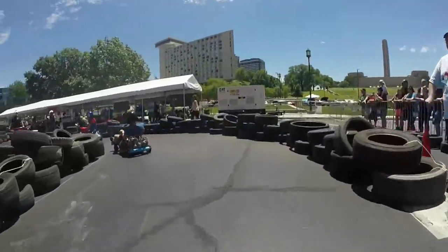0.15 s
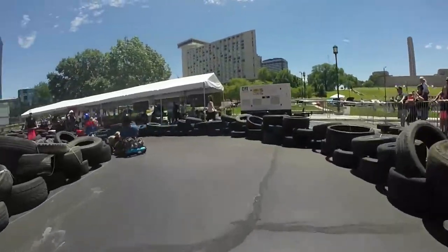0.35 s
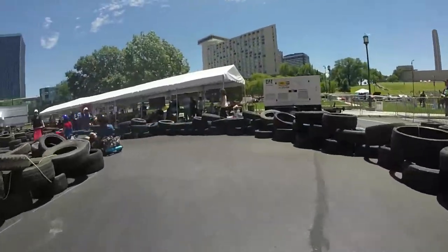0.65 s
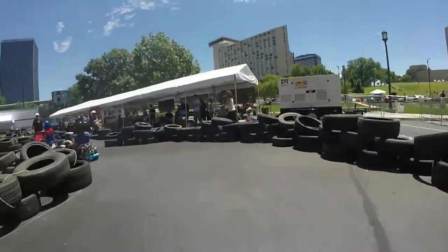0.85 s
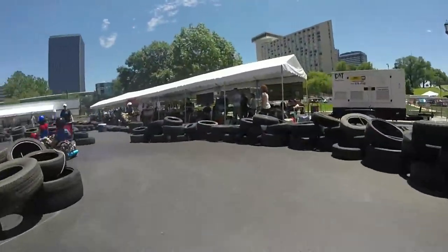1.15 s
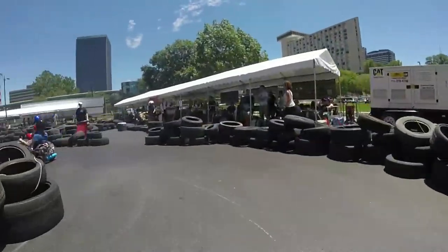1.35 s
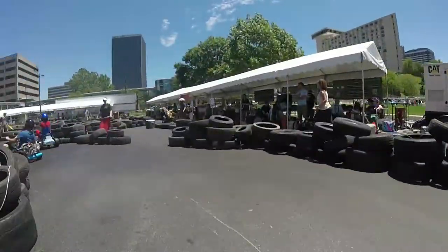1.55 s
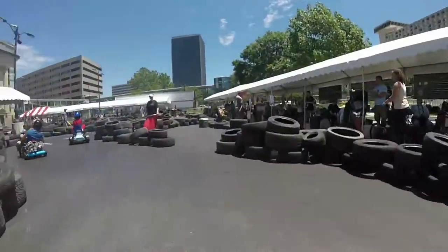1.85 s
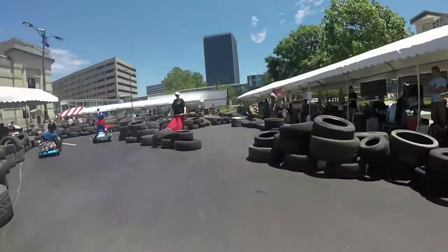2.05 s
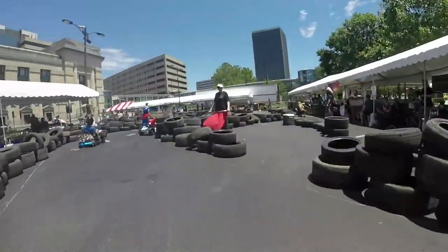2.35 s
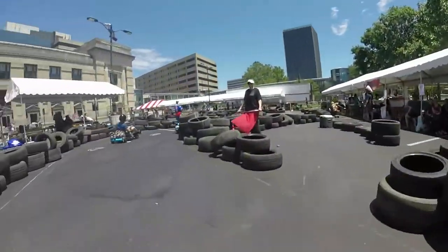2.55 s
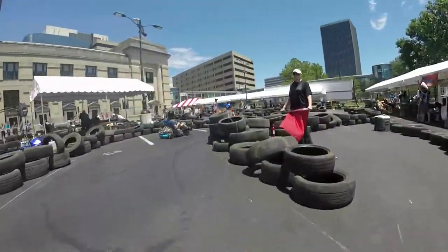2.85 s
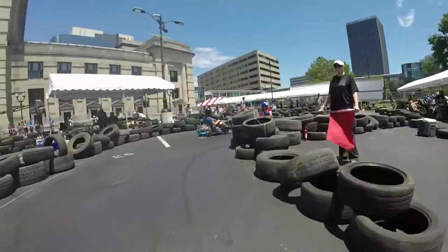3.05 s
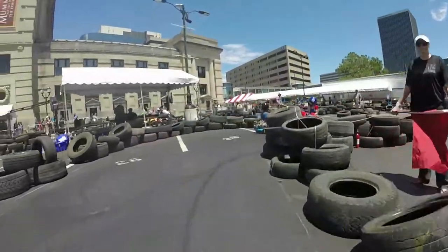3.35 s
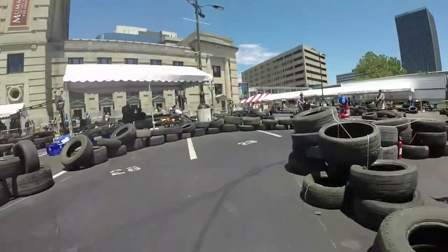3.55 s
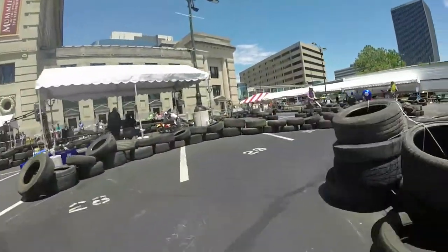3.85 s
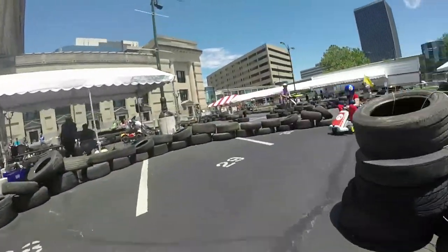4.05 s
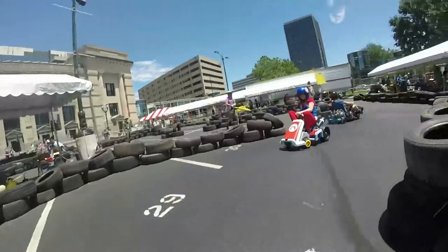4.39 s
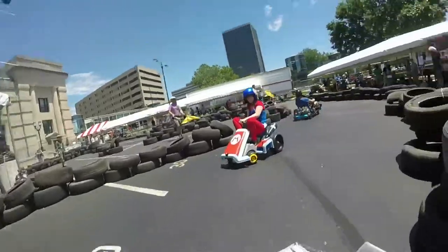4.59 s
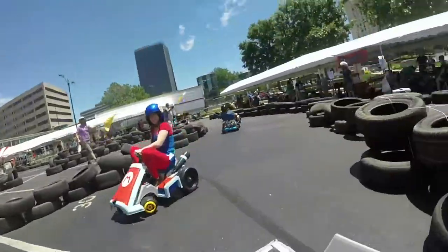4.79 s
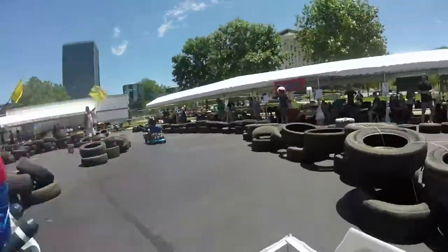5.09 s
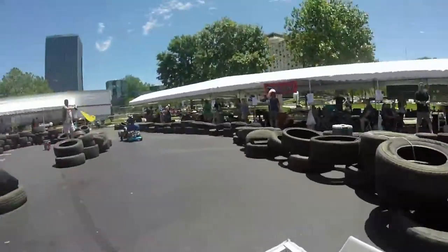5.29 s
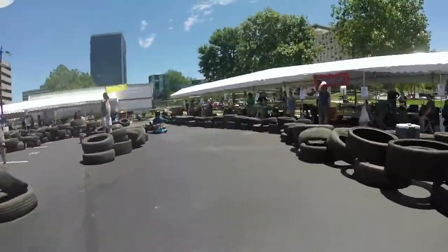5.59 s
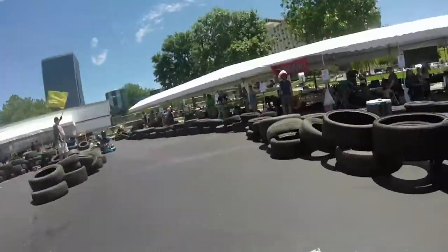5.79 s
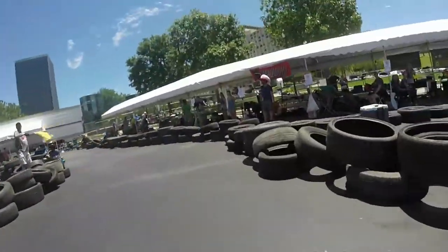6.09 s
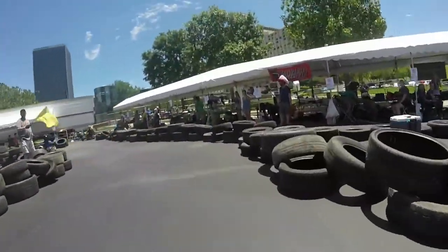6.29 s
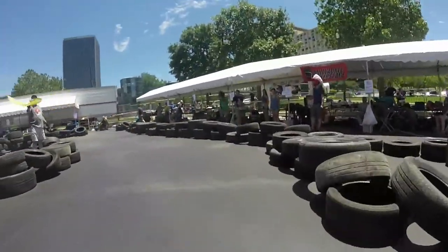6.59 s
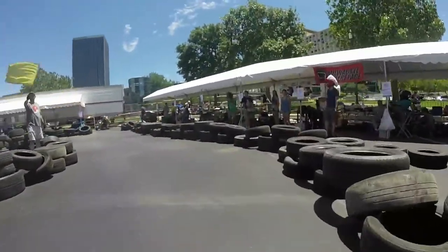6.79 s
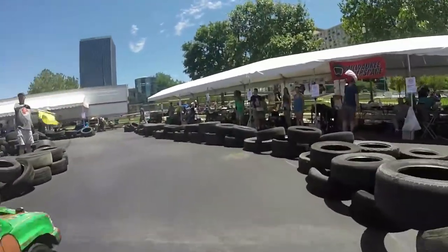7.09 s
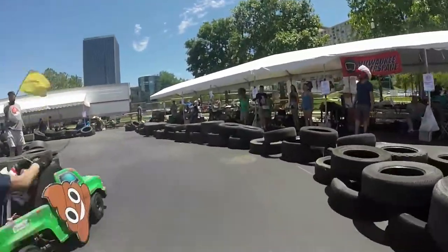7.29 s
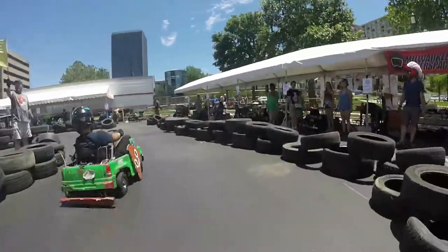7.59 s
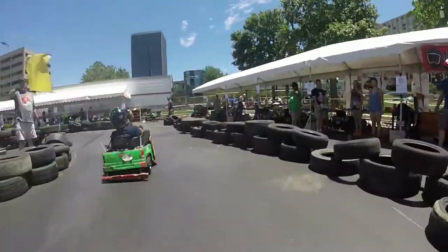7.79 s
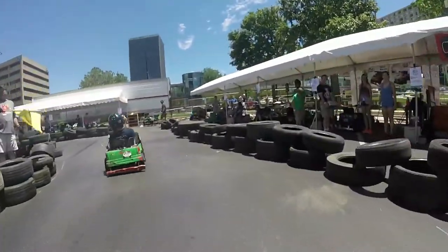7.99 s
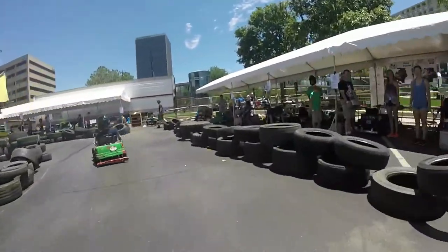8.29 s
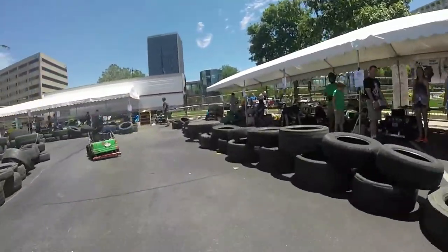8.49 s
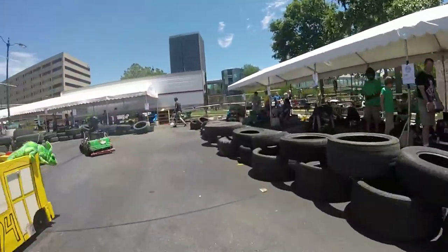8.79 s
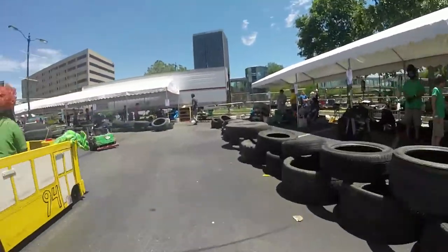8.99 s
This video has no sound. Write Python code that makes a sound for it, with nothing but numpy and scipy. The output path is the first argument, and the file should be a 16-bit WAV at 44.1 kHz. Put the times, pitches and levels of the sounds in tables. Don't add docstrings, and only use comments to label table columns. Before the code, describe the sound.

Small electric kart whines steadily, cuts to silent coasting with rattling knocks and frame thumps, then snatches back into a lower, climbing whine.

```python
import sys
import numpy as np
from scipy import signal
from scipy.fft import rfft, irfft
from scipy.io import wavfile
from scipy.ndimage import uniform_filter1d

SR = 44100
rng = np.random.default_rng(int(sys.argv[2]) if len(sys.argv) > 2 else 0)


def invert_db(x):
    u = np.asarray(x, float) / 20
    return 10 ** u


def master(y):
    cut = np.clip(np.atleast_2d(y).T, -1, 1)
    pcm = np.round(cut * 32767)
    wavfile.write(sys.argv[1], SR, pcm.astype(np.int16))


N = 403074
TIME_S = np.arange(N) / SR
TEETH_PER_TURN = 2.099
MAIN_ORDERS = [TEETH_PER_TURN, 2 * TEETH_PER_TURN, 3, 4, 6]
LIFT_OFF_S = 4.56

# [freq_hz, density_db]
LOOSE_SPECTRUM = [(500, -38), (700, 3), (860, -3), (990, -8), (1140, -2.5), (1600, -2), (1800, -5),
                  (2300, -5), (3000, -19), (3300, -21), (3750, -21), (4300, -42), (9000, -70)]


def rms_one(x):
    return x / np.sqrt(np.mean(x ** 2) + 1e-20)


def in_time(rows):
    s, *columns = np.transpose(rows)
    return [np.interp(TIME_S, s, column) for column in columns]


def spells_db(rows, rise_db_s, sag_db_s, fall_db_s, rest_db):
    grid_s = np.arange(0, N / SR + .002, .001)
    start_s, length_s, level_db = np.transpose(rows)[:, :, None]
    age_s = grid_s - start_s
    rise = rise_db_s * np.minimum(age_s, 0)
    sag = sag_db_s * np.clip(age_s, 0, length_s)
    fall = fall_db_s * np.maximum(age_s - length_s, 0)
    shape_db = level_db + rise - sag - fall
    return np.interp(TIME_S, grid_s, np.maximum(shape_db.max(axis=0), rest_db))


def drift(rate_hz):
    r = np.exp(-40 * np.pi * rate_hz / SR)
    slow = signal.lfilter([1], [1, -2 * r, r * r], rng.standard_normal(N // 20 + 2002))[2000:]
    return np.interp(np.arange(N) / 20, np.arange(len(slow)), rms_one(slow))


def grit(per_s, spread_db):
    sizes = invert_db(spread_db * np.minimum(rng.exponential(1, N), 4)) * rng.standard_normal(N)
    return rms_one(sizes * (rng.random(N) < per_s / SR))


def once_per(cycles):
    return np.diff(np.floor(cycles), prepend=np.floor(cycles[0]))


def colour(x, spectrum):
    hz, level_db = np.transpose(spectrum)
    log_hz = np.log(np.maximum(np.arange(4097) * SR / 8192, 1))
    cepstrum = irfft(np.interp(log_hz, np.log(hz), level_db) * np.log(10) / 20)
    cepstrum[1:4096] *= 2
    cepstrum[4097:] = 0
    response = irfft(np.exp(rfft(cepstrum)))
    return signal.oaconvolve(x, response / np.linalg.norm(response))[:N]


def ring(clicks, hz, width_hz):
    r, w = np.exp(-np.pi * width_hz / SR), 2 * np.pi * hz / SR
    return signal.lfilter([0, np.sin(w)], [1, -2 * r * np.cos(w), r * r], clicks + 1e-18)


def panels(x, modes):
    out = 0
    for hz, width_hz, db in modes:
        edges_hz = [hz - width_hz / 2, hz + width_hz / 2]
        band = signal.butter(2, edges_hz, "band", fs=SR, output="sos")
        out = out + invert_db(db) * signal.sosfilt(band, x + 1e-18)
    return out


def frame_db(hz):
    # [mode_hz, width_hz, gain_db]
    resonances = [(205.3, 26, -4), (249.6, 13.2, 0.48), (314.5, 11.3, 2.3), (393.4, 41.7, -3.5),
                  (624.6, 41, -16)]
    coarse_hz = hz[::64]
    total = 0
    for k, (mode_hz, width_hz, db) in enumerate(resonances):
        detuning = mode_hz ** 2 - coarse_hz ** 2 + 1j * width_hz * coarse_hz
        total = total + (-1) ** k * invert_db(db) * coarse_hz ** 2 * width_hz / mode_hz / detuning
    return np.interp(np.arange(N) / 64, np.arange(len(coarse_hz)), 20 * np.log10(np.abs(total)))


def drive_state():
    # [time_s, turns_hz, load_db]
    speed = [(0.0, 104.3, 0), (0.3, 106.8, 0), (1.05, 111.1, -0.1), (1.3, 113.2, 1.2), (1.9, 114.6, 0.1),
             (2.5, 110.6, 0.1), (3.2, 108.4, 0.1), (4.42, 107.3, 0.4), (4.6, 101.1, -6.5),
             (6.88, 63.13, -7), (7.07, 62.19, -0.1), (7.46, 66.33, -3.5), (7.76, 72.08, -1),
             (8.07, 76.44, 3.5), (8.3, 77.36, 1.5), (8.58, 81.07, 3), (8.95, 83.5, 1), (9.14, 88.16, 6.5)]
    # [cruise_db, pull_db]
    forces = [
        (-2, -5),
        (-18.5, -18.5),
        (-15, -13),
        (-20, -15),
        (-5, 1),
    ]
    throttle_s, fade_s, start_turn = 6.83, 0.068, 0.03
    turns_hz, load_db = in_time(speed)
    turns_hz = turns_hz * (1 + .0025 * drift(6))
    driven, pulling = in_time([(LIFT_OFF_S, 1, 0), (LIFT_OFF_S + fade_s, 0, 0),
                               (throttle_s, 0, 1), (throttle_s + fade_s, 1, 1)])
    levels_db = []
    for order, (cruise_db, pull_db) in zip(MAIN_ORDERS, forces):
        force_db = cruise_db + pulling * (pull_db - cruise_db) + load_db
        levels_db.append(force_db + frame_db(order * turns_hz))
    return start_turn + np.cumsum(turns_hz) / SR, levels_db, load_db, driven, pulling


def drivetrain(turns, levels_db, driven, pulling):
    # [order_per_turn, cruise_db, pull_db]
    motor_lines = [(5, -19, -24), (7, -21, -22.5), (8, -27, -17), (9, -50, -46), (10, -58.5, -50),
                   (11, -61.5, -53.5), (12, -60, -41), (13, -65.5, -55), (14, -60, -57.5), (15, -60, -51.5),
                   (16, -64.5, -55), (17, -56.5, -53.5), (18, -55.5, -47.5), (19, -59, -61), (20, -61, -57),
                   (21, -66, -58.5), (22, -63.5, -61.5), (23, -62.5, -59.5), (24, -64, -50.5),
                   (25, -68.5, -57), (26, -66, -56), (27, -69, -57.5), (29, -70.5, -58.5), (28, -65, -57.5),
                   (30, -65.5, -57.5), (33, -66, -64), (36, -69.5, -50), (42, -76, -55.5)]
    # [order_per_turn, cruise_db, pull_db]
    side_lines = [(12.29, -61.5, -58.5), (16.29, -67.5, -55.5), (19.71, -68.5, -54)]
    # [tooth_multiple, cruise_db, pull_db]
    tooth_lines = [(3, -33.5, -28.5), (4, -49, -54), (5, -50.5, -53.5), (6, -58, -63), (7, -56, -62),
                   (8, -61, -59), (9, -55, -61.5), (10, -55.5, -56.5), (11, -56.5, -59), (12, -58, -61.5)]
    # [freq_hz, gain_db]
    panel_response = [(410, -21), (600, 1), (720, -6), (880, -3.5), (990, -15.5), (1060, -8), (1140, -4),
                      (1370, 2.5), (1700, -1), (2040, -7.5), (2400, -10), (2660, -4), (2790, -21.5),
                      (3280, -16.5), (3530, -38.5), (7770, -120)]
    turns_hz = np.gradient(turns) * SR
    direct, high = np.zeros(N), np.zeros(N)
    for order, level_db in zip(MAIN_ORDERS, levels_db):
        slack = .014 * drift(18)
        direct += invert_db(level_db + 1.3 * drift(18)) * np.cos(2 * np.pi * (order * turns + slack))
    weak = motor_lines + side_lines + [(k * TEETH_PER_TURN, a, b) for k, a, b in tooth_lines]
    wavers = [drift(8.7) for _ in range(4)]
    swells = [invert_db(2.6 * waver) for waver in wavers]
    for k, (order, cruise_db, pull_db) in enumerate(weak):
        level = (invert_db(cruise_db) + pulling * (invert_db(pull_db) - invert_db(cruise_db))) * swells[k % 4]
        phase = order * turns + rng.random() + 0.08 * wavers[k % 3]
        line = level * np.sin(2 * np.pi * phase)
        if order < 8.2:
            direct += invert_db(frame_db(order * turns_hz)) * line
        else:
            high += line
    return np.sqrt(2) * driven * (direct + colour(high, panel_response))


def easing_db():
    ease_s, whip_at_s, whip_end_s, wheel_hz = 4.0, 4.503, 4.72, 26
    eased = np.clip((TIME_S - ease_s) / (LIFT_OFF_S - ease_s), 0, 1) * (TIME_S < whip_end_s)
    return eased * (-4 + 6 * np.cos(2 * np.pi * wheel_hz * (TIME_S - whip_at_s)))


def spray():
    # [start_s, length_s, level_db]
    sprays = [
        (6.702, 0.12, -50.5),
        (6.74, 0.013, -43),
    ]
    roar = invert_db(spells_db([sprays[0]], 21.5, 0, 20.5, -120))
    return roar + invert_db(spells_db([sprays[1]], 900, 0, 504, -120))


def road_levels(load_db, driven, pulling, buzz, passing_db, eased_db):
    # [start_s, length_s, level_db]
    bumps = [
        (4.62, 0.25, -21.5),
        (4.8, 0.056, -15.5),
        (4.935, 0.099, -9.5),
        (5.1, 0.424, -14),
        (5.74, 0.073, -14.5),
        (5.88, 1, -23.5),
        (6.078, 0.013, -16.5),
        (6.44, 0.29, -21),
        (6.6, 0.28, -15),
        (6.84, 0.12, -9.5),
    ]
    smooth_db, coast_hiss_db = -25.5, -62.5
    bumps_db = spells_db(bumps, 494, 4, 354, smooth_db)
    follow_db = 0.18 * load_db
    rumble_db = -19.5 - 1.5 * pulling + follow_db
    clatter_db = -31.5 + 1.5 * pulling + follow_db
    hiss_db = -58 - 2.5 * pulling + follow_db
    rumble_db = np.maximum(bumps_db, smooth_db + driven * (rumble_db - smooth_db))
    loose_db = -45 + 0.51 * (bumps_db + 23.5)
    hiss = invert_db(coast_hiss_db + driven * (hiss_db - coast_hiss_db))
    hiss = hiss + invert_db(14.5) * buzz + invert_db(passing_db + 2.5) + spray()
    clatter_db = 20 * np.log10(invert_db(clatter_db) + invert_db(35) * buzz)
    clatter_db = loose_db + driven * (clatter_db + eased_db - loose_db)
    return rumble_db, clatter_db, 20 * np.log10(hiss) + driven * eased_db


def road(turns, driven, rumble_db, clatter_db, hiss_db):
    # [start_s, length_s, level_db]
    lurches = [
        (0.0, 0.044, -23),
        (0.8, 0.077, -20.5),
        (4.63, 0.15, -23),
        (5.75, 0.11, -16.5),
        (6.8, 0.078, -17.5),
        (8.2, 0.22, -23),
        (.43, .05, -23),
        (5.2, 0.11, -26),
        (5.95, 0.13, -19),
    ]
    # [freq_hz, density_db]
    rumble_spectrum = [(26, -41.5), (45, -20.5), (65, -9.5), (136, -14), (228, -3.5), (303, -2), (345, -5),
                       (403, -12), (436, -15.5), (619, -24.5), (723, -43), (792, -25.5), (1000, -46.5),
                       (1300, -64), (2200, -120)]
    # [freq_hz, density_db]
    clatter_spectrum = [(410, -25.5), (700, 2.5), (858, -8.5), (930, -2), (990, -16.5), (1060, -9),
                        (1140, -2.5), (1370, 1.5), (1540, -4), (1640, -2.5), (1770, -7), (2040, -9),
                        (2340, -5.5), (2900, -22), (3280, -15.5), (3530, -39.5), (4590, -47), (7770, -120)]
    # [freq_hz, density_db]
    hiss_spectrum = [(2600, -102.6), (3300, -85.5), (3750, -77.5), (4200, -83), (4700, -81.5),
                     (5200, -88.5), (5700, -84.5), (6300, -85), (7000, -98), (7600, -95.5), (8500, -93.5),
                     (10000, -101.2), (12000, -104.7), (13500, -110), (15500, -140)]
    slack_s, sway_hz = 5.05, 27
    sway_db = spells_db(lurches, 82, 0, 48, -30)
    tooth_beat = 1 + .4 * np.cos(2 * np.pi * (TEETH_PER_TURN * turns - .05))
    jolts = drift(30) + .5 * drift(12)

    rumble = colour(invert_db(rumble_db + 1.1 * jolts) * rng.standard_normal(N), rumble_spectrum)
    tension = np.maximum(driven, np.clip(20 * (slack_s - TIME_S), 0, 1))
    low = signal.sosfiltfilt(signal.butter(2, 150, fs=SR, output="sos"), rumble)
    rumble = rumble - 0.55 * tension * low

    sway = ring(ring(rng.standard_normal(N), sway_hz, 16), sway_hz, 26)
    sway = invert_db(sway_db) * rms_one(sway)

    shake = invert_db(clatter_db + 2.2 * jolts * (1 - 0.37 * driven)) * grit(5000, 2.2)
    chain = colour(shake * driven * tooth_beat, clatter_spectrum)
    sparse = invert_db(clatter_db - 20.5) * grit(150, 2.5)
    rattle = colour((1 - driven) * (shake + sparse), LOOSE_SPECTRUM)

    air = (1 - driven + driven * tooth_beat) * invert_db(hiss_db + 2.3 * jolts) * grit(12000, 1.5)
    case_seal = signal.butter(2, 8500, fs=SR, output="sos")
    hiss = signal.sosfilt(case_seal, colour(air, hiss_spectrum))
    return rumble + sway + chain + rattle + hiss + invert_db(15.0) * panels(air, [(5630, 54, 0.0046)])


def ticks(driven):
    # [time_s, peak_db]
    slaps = [(0.0569, -42), (0.164, -37), (0.2514, -38), (0.312, -38), (0.4046, -51), (0.5813, -35),
             (0.628, -49), (3.7394, -40.5), (4.004, -34), (5.123, -42), (5.6243, -41), (5.7917, -24.5),
             (6.7449, -29), (7.204, -37), (7.29, -48), (7.4915, -36), (7.63, -36), (7.945, -38.5),
             (8.08, -24.5), (8.1786, -30.5), (8.436, -52), (8.4835, -32.5), (8.543, -36.5), (8.6065, -49.5),
             (8.8058, -39.5), (9.0503, -37), (0.078, -43), (0.917, -42.5), (1.156, -42.5), (3.912, -34),
             (7.134, -40), (7.222, -42), (7.345, -38), (7.648, -34.5), (8.301, -49), (8.673, -44.5),
             (8.898, -40.5), (9.1, -42.5), (4.928, -41), (5.024, -37.5), (5.765, -36.5), (8.125, -39),
             (8.148, -42), (8.197, -39.5), (8.268, -41), (8.377, -51.5)]
    # [freq_hz, width_hz, gain_db]
    modes = [(1500, 2800, 4), (2420, 1200, 11.5), (3200, 240, 6), (4750, 860, 5), (5470, 450, 4),
             (6600, 350, -5), (9000, 3800, -28.5)]
    clicks = invert_db(-68) * driven * grit(200, 1.8)
    for s, peak_db in slaps:
        clicks[round(s * SR)] += invert_db(peak_db + 10.0)
    puffs = signal.lfilter([1], [1, -.975], clicks) * rng.standard_normal(N)
    return panels(puffs, modes)


def buzz_spells():
    # [start_s, end_s, level_db]
    spans = [(0.132, 0.22, -79), (0.243, 0.306, -81), (0.393, 0.407, -74), (0.543, 0.585, -76),
             (0.714, 0.741, -78), (0.883, 0.907, -69), (0.974, 0.988, -71), (1.021, 1.031, -75),
             (1.191, 1.715, -70.5), (1.774, 1.809, -76), (1.84, 1.93, -73), (1.966, 2.027, -70.5),
             (2.046, 2.08, -72), (2.09, 2.404, -72.5), (2.43, 2.9, -73.5), (3.005, 3.213, -74.5),
             (3.33, 3.394, -74.5), (3.45, 3.476, -75.5), (3.525, 3.627, -72.5), (3.757, 3.876, -75.5),
             (3.908, 3.964, -69.5), (4.11, 4.217, -75), (4.39, 4.414, -84)]
    spells = np.full(N, invert_db(-97.5))
    for start_s, end_s, db in spans:
        spells[round(start_s * SR):round(end_s * SR)] = invert_db(db)
    return uniform_filter1d(spells, size=400)


def case_buzz(turns, driven, spells, eased_db):
    # [freq_hz, width_hz, gain_db]
    modes = [(5300, 600, -15.5), (6220, 600, -5.5), (8700, 690, -17), (11900, 1700, -16.5)]
    spells = spells * invert_db(1.8 * drift(18)) * driven * (TIME_S < 4.6)
    play = .012 * drift(120)
    teeth = once_per(TEETH_PER_TURN * turns + 0.024 + play) * invert_db(1.8 * rng.standard_normal(N))
    buzz = invert_db(16.0) * spells * rms_one(panels(teeth, modes))
    taps = once_per((3 - TEETH_PER_TURN) * turns + .04 * drift(60)) * invert_db(3.0 * rng.standard_normal(N))
    bracket = rms_one(panels(taps, [(3324, 260, 0.5), (5000, 880, -14.5)]))
    return buzz + invert_db(-51.0 + 2.6 * drift(25) + 2 * eased_db) * driven * bracket


def scrapes():
    # [start_s, end_s, level_db]
    strokes = [
        (3.817, 3.941, -30),
        (4.925, 5.029, -29),
        (5.73, 5.79, -32.5),
        (5.8, 5.825, -34.5),
        (5.832, 5.865, -35.5),
        (6.034, 6.065, -50),
        (6.547, 6.725, -35),
        (6.767, 6.821, -32.5),
        (6.844, 6.9, -26.5),
        (6.905, 7.029, -26.5),
    ]
    stroke = np.zeros(N)
    for start_s, end_s, db in strokes:
        span = slice(round(start_s * SR), round(end_s * SR))
        stroke[span] = invert_db(db) * np.linspace(1, .5, span.stop - span.start)
    grains = uniform_filter1d(stroke, size=300) * invert_db(2.5 * drift(90)) * grit(2500, 2.0)
    modes = [(544, 670, 16.0), (2250, 640, -0.5), (5000, 1200, -9), (8170, 3000, -27.0)]
    return colour(grains, LOOSE_SPECTRUM) + panels(grains, modes)


def knocks():
    # [time_s, peak_db, ring_hz, bright_db]
    strikes = [(4.6124, -25.5, 2230, -36), (4.639, -29, 1130, -29), (4.6593, -30, 1530, -31),
               (4.6964, -30, 1580, -31), (4.79, -33.5, 1890, -25), (4.929, -20, 1270, -27),
               (4.9452, -18.5, 2050, -28), (4.9716, -17, 1130, -27), (5.0237, -26, 1350, -20),
               (5.0868, -33, 1380, -25), (5.1053, -34, 1280, -17), (5.1636, -9.5, 2250, -16),
               (5.1895, -17.5, 2500, -25), (5.209, -20, 2300, -18), (5.234, -19, 2420, -10),
               (5.2525, -20, 1900, -21), (5.4335, -32, 1350, -18), (5.4486, -36, 1160, -21),
               (5.4984, -41, 1380, -23), (5.646, -32, 1140, -21), (5.738, -20, 2360, -29),
               (5.7633, -24, 1500, -16), (5.8003, -9.5, 2260, -20), (5.8406, -27, 2240, -17),
               (5.8514, -27, 2250, -23), (5.9065, -33, 1600, -24), (5.9366, -36, 1620, -20),
               (5.9974, -38, 1620, -19), (6.026, -23.5, 2256, -16), (6.036, -28.5, 2240, -17),
               (6.0553, -25.5, 2270, -16), (6.106, -33, 1160, -23), (6.1275, -34, 2300, -23),
               (6.223, -36, 2120, -14), (6.234, -23, 2320, -15), (6.2662, -31, 2330, -19),
               (6.2901, -30, 1600, -24), (6.3884, -32, 1600, -24), (6.406, -25, 1320, -29),
               (6.5086, -42, 1170, -16), (6.5261, -38, 1270, -14), (6.551, -33, 1720, -4),
               (6.5814, -23, 2320, -14), (6.6049, -28, 1560, -19), (6.648, -20, 1130, -15),
               (6.6714, -29, 2240, -18), (6.697, -21.5, 2250, -21), (6.8021, -11.5, 1730, -36),
               (6.8443, -34, 2250, -28), (6.8713, -21, 2320, -21),
               (5.1357, -33, 2270, -28), (5.1664, -16, 2420, -25), (5.2734, -36, 1900, -11),
                (5.4604, -37, 1440, -20), (5.7324, -27, 1500, -28), (5.7564, -33, 2250, -28),
                (5.773, -24, 1300, -30), (5.8124, -31, 1610, -25), (5.8604, -32, 2200, -25),
                (5.9733, -42, 1100, -25), (6.443, -45, 1000, -25), (6.5685, -34, 1200, -25),
                (6.5954, -27, 2250, -25), (6.6214, -29, 1730, -25), (6.656, -23, 1300, -25),
                (6.708, -26, 2250, -28), (6.72, -25, 2250, -28)]
    # [freq_hz, width_hz, gain_db]
    case_modes = [(3310, 310, 12), (4000, 970, -1), (4720, 540, -4), (5800, 620, -2.5), (6700, 430, -4.5)]
    out, crack, bright = np.zeros(N), np.zeros(N), np.zeros(N)
    age_s = np.arange(900) / SR
    hits = strikes
    envelope = np.tanh(age_s / 0.0005) * np.exp(-age_s / 0.0042)
    tone_envelope = np.exp(-age_s / 0.003) * np.tanh(age_s / 0.0014)
    bursts = envelope * rng.standard_normal((len(hits), 900))
    for (s, peak_db, hz, bright_db), noise in zip(hits, bursts):
        at = round(s * SR)
        out[at:at + 900] += invert_db(peak_db + 5.5) * np.sin(2 * np.pi * hz * age_s) * tone_envelope
        crack[at:at + 900] += invert_db(peak_db - 1.5) * noise
        bright[at:at + 900] += invert_db(peak_db + bright_db + 15) * noise * np.exp(-age_s / 0.0046)
    out += colour(crack, LOOSE_SPECTRUM)
    out += panels(crack, [(1840, 52, 8.2), (2350, 69, 4), (2360, 250, 3.5)])
    out += panels(bright, case_modes)
    return signal.sosfilt(signal.butter(4, 7200, fs=SR, output="sos"), out)


def blows(rows, decay_s):
    out, age_s = np.zeros(N), np.arange(3000) / SR
    envelope = np.exp(-age_s / decay_s) * np.tanh(age_s / (0.3 * decay_s))
    for s, peak_db, hz in rows:
        at = round(s * SR)
        out[at:at + 3000] += invert_db(peak_db - 4.5) * np.sin(2 * np.pi * hz * age_s) * envelope
    return out


def thumps():
    # [time_s, peak_db, pitch_hz]
    hits = [(4.84, -25, 284), (4.938, -19, 326), (5.082, 0, 303), (5.163, -37, 308), (5.243, 2.5, 307.4),
            (5.3, -6, 130.7), (5.382, 0, 326), (5.426, -3, 180), (5.726, 2, 165.7), (5.77, 1.5, 284),
            (5.8, 0, 93.2), (5.859, 1, 244), (6.071, 0, 322), (6.253, -8.5, 195), (6.382, -4, 173),
            (6.645, 5.5, 313), (6.77, -10, 232), (6.82, -9, 314), (4.694, -22, 248), (5.979, -17.5, 307),
            (6.125, -7.5, 318), (6.217, -13, 326), (6.328, -5, 300), (6.502, -20, 301)]
    return blows(hits, decay_s=.012)


def squeaks():
    # [start_s, end_s, start_hz, end_hz, level_db]
    glides = [
        (4.82, 4.903, 3650, 3720, -54),
        (5.28, 5.357, 3600, 3750, -48),
        (5.309, 5.403, 3440, 3460, -51),
        (5.59, 5.73, 3750, 3800, -53),
    ]
    out, waver_hz = np.zeros(N), 110 * drift(150)
    for start_s, end_s, hz, end_hz, db in glides:
        span = slice(round(start_s * SR), round(end_s * SR))
        pitch_hz = np.linspace(hz, end_hz, span.stop - span.start) + waver_hz[span]
        out[span] += invert_db(db) * np.hanning(len(pitch_hz)) * np.sin(2 * np.pi * np.cumsum(pitch_hz) / SR)
    return out


def slams():
    # [time_s, peak_db, pitch_hz]
    landings = [(4.947, 12, 300), (4.972, 10, 314), (4.9815, 11, 300), (4.994, 12, 300),
                (5.0232, 13.5, 280), (5.0545, 6, 280), (5.731, 3, 250), (5.773, 4, 300), (6.649, -10, 300),
                (6.827, 7, 300), (6.878, -1, 250.8), (6.9, -4, 300)]
    return blows(landings, decay_s=0.0045)


def passer_db():
    start_s, length_s, level_db = 6.72, .73, -55.5
    hidden_s, hidden_width_s, hidden_db = 7.03, .06, -8
    ahead_db = np.where(TIME_S > start_s, -62, -120)
    swell_db = spells_db([(start_s, length_s, level_db)], 25, -3, 250, -120).clip(ahead_db)
    return swell_db + hidden_db * np.exp(-((TIME_S - hidden_s) / hidden_width_s) ** 2)


def passer(level_db):
    # [freq_hz, density_db]
    fizz = [(5500, -25), (7000, -7.5), (7600, -1.5), (8500, -6.5), (10000, -12.5), (11500, -15),
            (12700, -12.5), (13500, -20.5), (14600, -30.5), (15500, -61.5)]
    return colour(invert_db(level_db + 1.1 * drift(12)) * rng.standard_normal(N), fizz)


def snatch(turns):
    # [start_s, length_s, level_db]
    spans = [
        (6.905, 0.086, -28.5),
        (7.06, 0.03, -46),
        (8.125, 0.06, -35.5),
    ]
    # [freq_hz, width_hz, gain_db]
    modes = [(1400, 600, -4.5), (2270, 280, 0), (3200, 450, -11)]
    slaps = once_per(TEETH_PER_TURN * turns + 0.029 * drift(90)) * invert_db(3.0 * rng.standard_normal(N))
    return invert_db(spells_db(spans, 400, 20.5, 250, -120)) * rms_one(panels(slaps, modes))


def scene():
    turns, levels_db, load_db, driven, pulling = drive_state()
    buzz, passing_db, eased_db = buzz_spells(), passer_db(), easing_db()
    noise_db = road_levels(load_db, driven, pulling, buzz, passing_db, eased_db)
    mix = drivetrain(turns, levels_db, driven, pulling) + road(turns, driven, *noise_db)
    mix += ticks(driven) + case_buzz(turns, driven, buzz, eased_db)
    mix += scrapes() + knocks() + thumps() + squeaks() + slams()
    mix += passer(passing_db) + snatch(turns)
    return mix[None]


def band_limit(x):
    return signal.sosfilt(signal.butter(12, 15350, fs=SR, output="sos"), x)


def record(dry):
    top_cut = signal.butter(6, 12500, fs=SR, output="sos")
    hiss = invert_db(-85.5) * signal.sosfilt(top_cut, rng.standard_normal(N))
    return band_limit(np.tanh(invert_db(-4) * dry) + hiss)


dry = scene()
out = record(dry)
master(out)
```